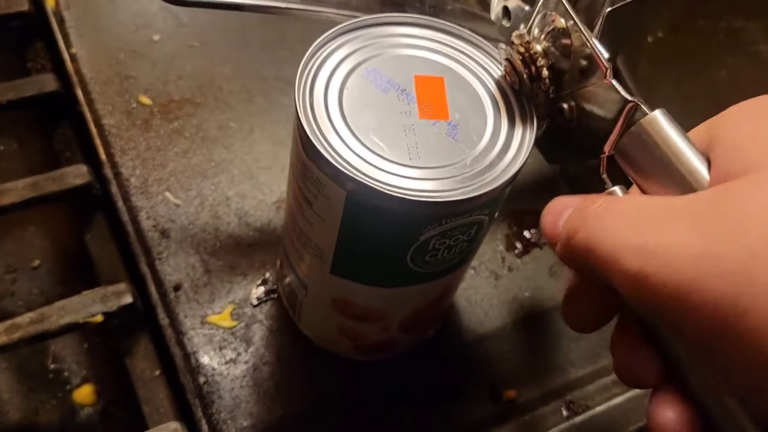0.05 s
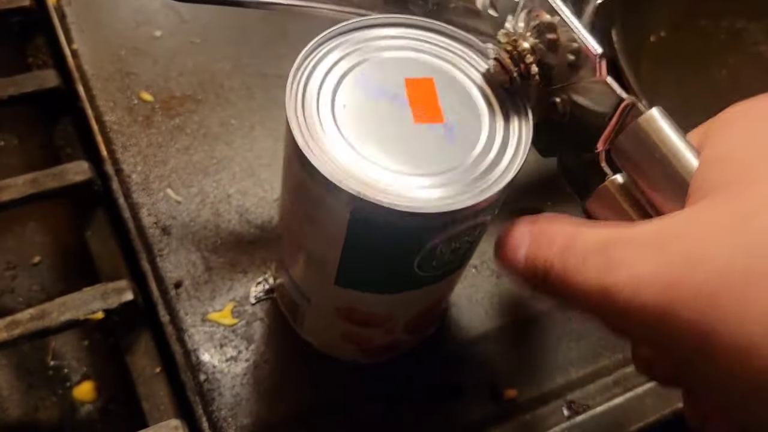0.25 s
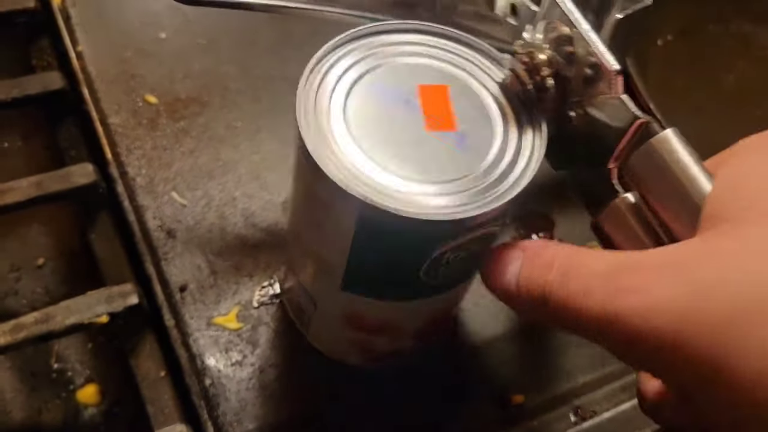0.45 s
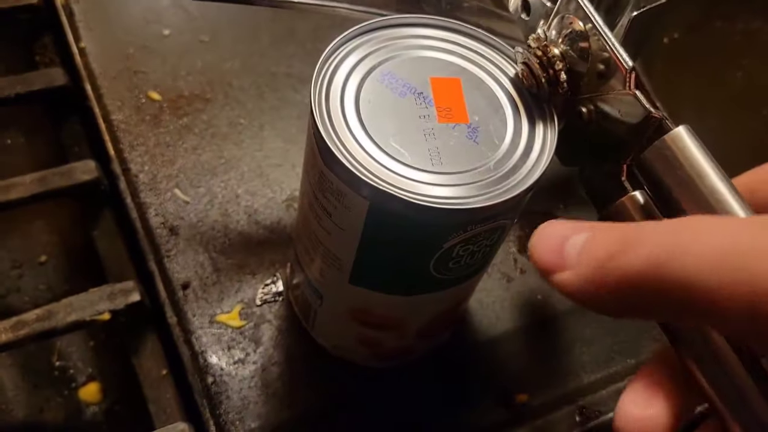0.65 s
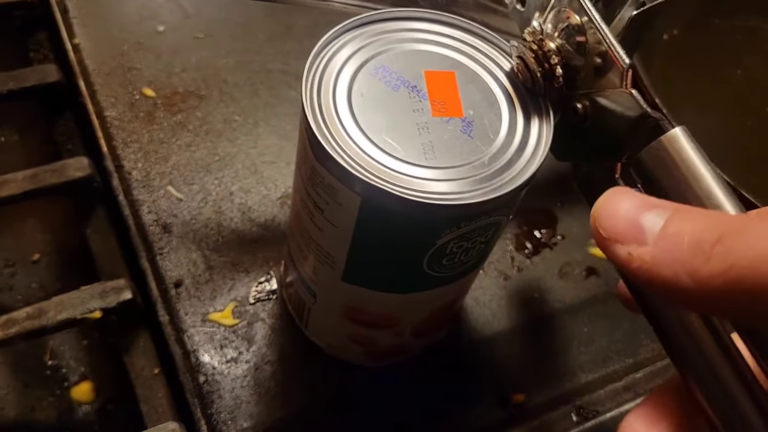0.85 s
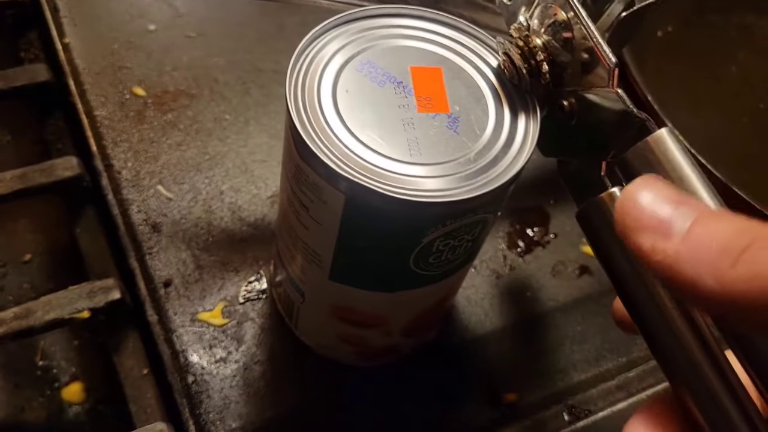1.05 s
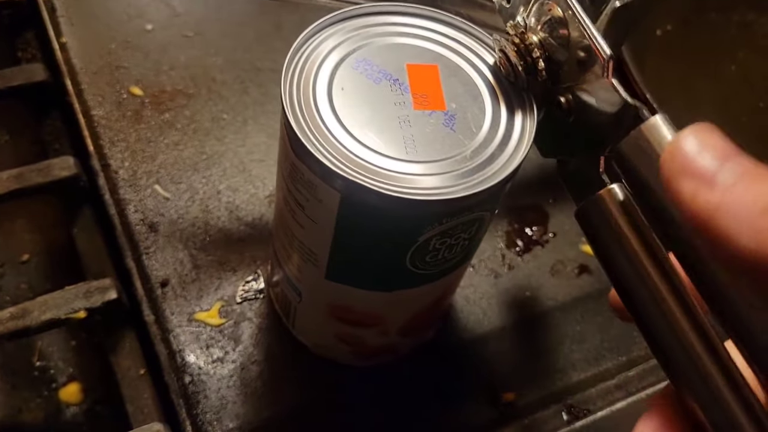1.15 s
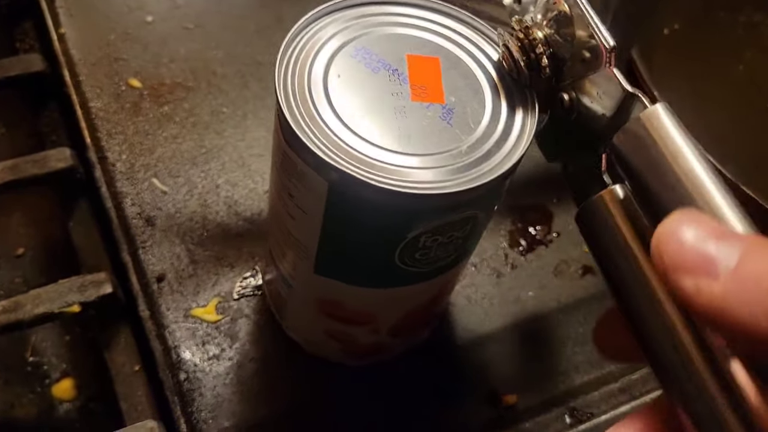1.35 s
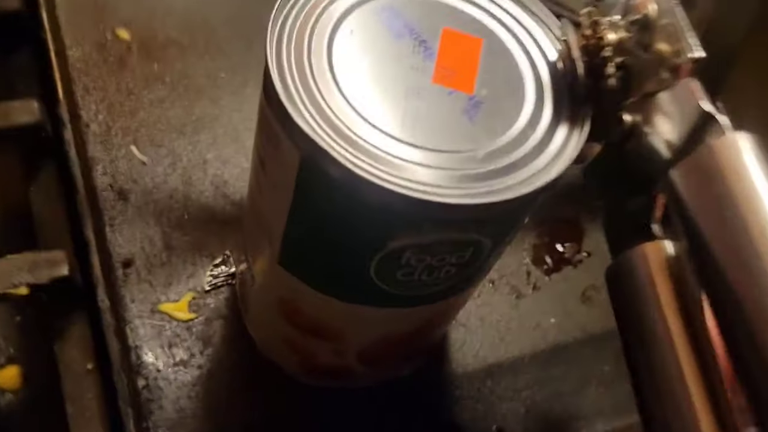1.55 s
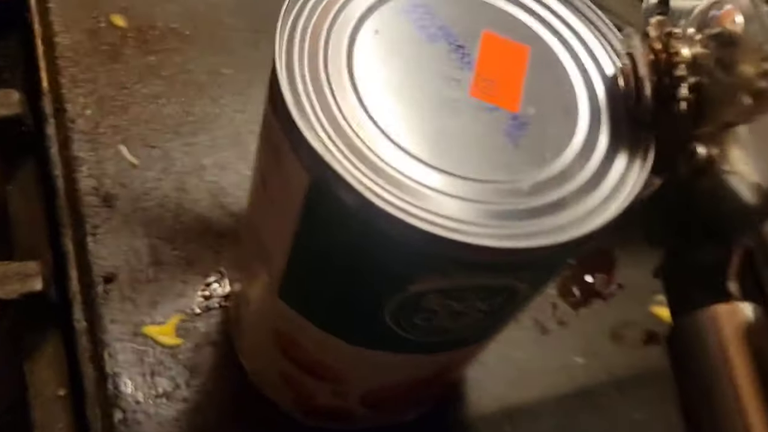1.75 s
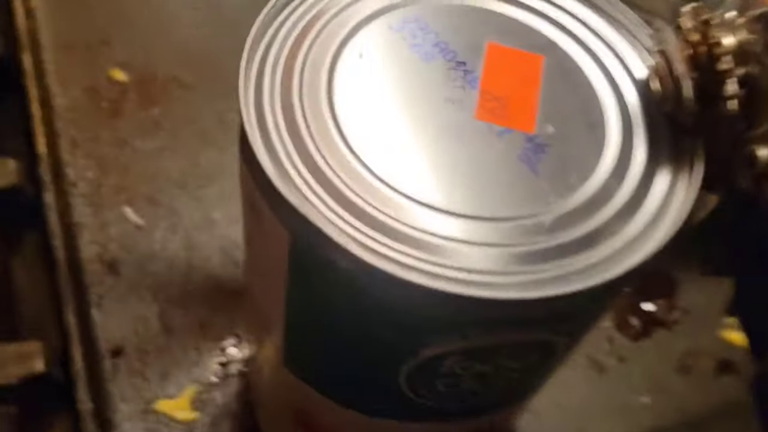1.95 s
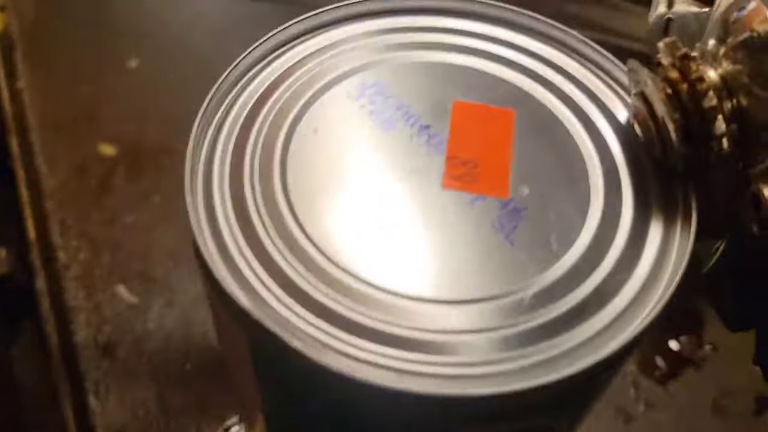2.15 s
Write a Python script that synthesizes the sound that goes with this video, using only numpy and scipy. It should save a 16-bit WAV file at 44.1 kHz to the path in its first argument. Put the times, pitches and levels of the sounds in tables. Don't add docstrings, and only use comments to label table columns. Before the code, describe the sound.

A can opener punctures a steel can: a tiny creak, then a loud tearing metallic snap at 0.39 s with a hollow ring, damped as the full can bumps and rocks at 0.63 s. Air puffs near 0.7 s and leaks with faint wavering whistles until 1.2 s. Tool clicks come at 1.57, 1.92 and 2.02 s, strongest around 2.13 s. Quiet small kitchen, low fridge hum, close stereo microphones.

```python
import sys
import numpy as np
from scipy import signal
from scipy.fft import rfft, irfft, next_fast_len
from scipy.io import wavfile
from scipy.ndimage import uniform_filter1d, map_coordinates

SR = 44100
rng = np.random.default_rng(int(sys.argv[2]) if len(sys.argv) > 2 else 0)


def wav_record(signal):
    frames = np.transpose(np.atleast_2d(signal))
    bounded = np.clip(frames, -1, 1)
    quanta = np.round(bounded * 32767).astype(np.int16)
    wavfile.write(sys.argv[1], SR, quanta)


def gain_from_db(level_db):
    decades = np.asarray(level_db, float) / 20
    return 10 ** decades


N = 97064
TIME_S = np.arange(N) / SR
PORTS = np.array([[1], [-1]])
SNAP_S, SNAP_PAN_DB = .3873, -1.5

# f/Hz, level/dB, t60/s, half lead of left port/rad
CAN_MODES = [(750, -12, .55, .3), (851, -10, .17, .5), (1037, -13, .25, .7), (1306, -2, .1, .9),
             (2440, -24, .1, .2), (2093, -25, .11, 0), (2180, -24, .2, -.7), (2585, -10, .08, -.35),
             (2845, -17, .22, -.5), (3305, -26, .17, .5), (506, -17, .16, -.2), (5130, -40, .7, .3),
             (7550, -54, 1.2, .3)]
# f/Hz, level/dB, t60/s
LID_MODES = [(1094, -23.5, 0.13), (3907, -25.5, 0.0076), (323.3, -31, 0.3), (577.2, -22.5, 0.14),
             (387, -27.5, 0.13), (196.1, -37.5, 0.18), (117, -39.5, 0.057)]


def can_ring():
    strike_db, lid_lead_rad = -8, .2
    rise_s, onset_s = .004, .00057
    pop_hz, pop_db, pop_hold_s, pop_t60_s, pop_lead_rad = 1030, -6.5, .005, .02, .55
    land_s, landed_t60_s = .63, .15
    t = since(SNAP_S)
    modes = [(f, db + strike_db, t60, lead) for f, db, t60, lead in CAN_MODES]
    modes += [(f, db, t60, lid_lead_rad) for f, db, t60 in LID_MODES]
    ring = 0
    for f, db, t60, lead in modes:
        ring = ring + gain_from_db(db) * fade(t, t60) * np.sin(2 * np.pi * f * t + PORTS * lead)
    ring = ring * (1 - 0.82 * np.exp(-t / rise_s))
    pop_level = gain_from_db(pop_db) * gain_from_db(-60 * (t - pop_hold_s).clip(0) / pop_t60_s)
    pop = pop_level * np.sin(2 * np.pi * pop_hz * t + PORTS * pop_lead_rad)
    onset = 1 - np.exp(-t / onset_s)
    landing = gain_from_db(-60 * since(land_s) / landed_t60_s)
    return pan(SNAP_PAN_DB) * (ring + pop) * onset * landing


# f/Hz, density/dB per Hz
TEAR_SPECTRUM = [(88, -37.5), (150, -17.5), (1310, -16), (1560, -24.5), (2550, -21.5), (6260, -27),
                 (10200, -48.5), (12700, -35), (16000, -47)]


def tear():
    t = since(SNAP_S)
    level = gain_from_db(-16) * fade(t, 0.055) + gain_from_db(-25.5) * fade(t, 0.22)
    return pan(SNAP_PAN_DB) * level * noise(TEAR_SPECTRUM, 0.38)


# f/Hz, density/dB per Hz
GRIT_SPECTRUM = [(700, -45.5), (1500, -7), (3500, -13), (4800, -7), (6800, -16.5), (8500, -32.5),
                 (14000, -22), (16500, -44.5)]


def creak():
    length_s, rise_db, pan_db = .014, 30, 11.5
    grit_db, tone_hz, tone_db = -24, 2130, -28
    t = since(SNAP_S - length_s)
    before_snap = (t > 0) * (since(SNAP_S) == 0)
    swell = before_snap * gain_from_db(rise_db * (t / length_s - 1).clip(-1, 0))
    grit = gain_from_db(grit_db) * noise(GRIT_SPECTRUM, .6) * swell
    tone = gain_from_db(tone_db) * np.sin(2 * np.pi * tone_hz * t) * swell ** .6
    return pan(pan_db) * (grit + tone)


# t/s, level/dB, f/Hz, length/cycles
BUMP_EVENTS = [(.630, -23, 512, 1.9), (0.632, -26.5, 1050, 2.5), (.640, -33.5, 753, 19.3),
               (0.65, -29, 290, 2.5), (.652, -36, 600, 9), (0.667, -31.5, 307, 4.6), (.686, -32, 305, 3.9),
               (0.719, -41.5, 292, 4.9), (.637, -34, 900, 4), (.706, -38, 200, 2.3), (.64, -36, 315, 40),
               (2.122, -27.5, 490, 1.44), (2.14, -27, 63.3, 1.4), (1.931, -34, 72, 0.33)]


def bumps():
    pan_db, left_lag_s = 2, -0.00025
    out = 0
    for s, db, f, cycles in BUMP_EVENTS:
        t = since(s, left_lag_s)
        decay = 3 * f / cycles
        envelope = np.e * decay * t * np.exp(-decay * t)
        out = out + gain_from_db(db) * envelope * np.sin(2 * np.pi * f * t)
    return pan(pan_db) * out


# f/Hz, density/dB per Hz
SCUFF_SPECTRUM = [(90, -35), (150, 0.5), (400, -6), (1100, -8.5), (2000, -20), (6000, -24), (9000, -37.5)]
# t/s, length/s, level/dB
SCUFF_EVENTS = [(0.629, 0.091, -40), (1.45, 0.32, -57), (-.05, 0.13, -49), (.381, 0.0072, -34),
                (.69, 0.13, -55), (.4, 0.14, -39.5), (1.78, 0.16, -62), (1.93, 0.029, -43.5),
                (2.014, 0.084, -51.5), (2.067, 0.14, -50), (2.129, 0.013, -34.5)]


def scuffs():
    return swells(SCUFF_EVENTS, 0.61) * gain_from_db(5.5 * wobble(90)) * noise(SCUFF_SPECTRUM, 0.21)


# f/Hz, density/dB per Hz
METAL_SPECTRUM = [(200, -44), (400, 1), (1500, -3), (3500, -1), (6500, -11), (8500, -39), (14000, -18),
                  (16500, -26.5)]
# t/s, level/dB, f/Hz, length/cycles,
# L-R/dB
CLICK_EVENTS = [(1.575, -24, 974, 4.8, 9.5), (1.5736, -25, 2660, 2.9, 13), (1.784, -42, 2600, 2.8, 11),
                (1.921, -17, 1220, 2.6, -5), (1.921, -22, 319, 1.53, -14.5), (1.9206, -7, 2800, 4, -3.7),
                (1.9206, -13, 3500, 3, -2.7), (1.9206, -14, 4400, 3, -5), (.3875, -9, 4200, 3, 1.4),
                (.3915, -14, 5000, 3, 3), (1.5743, -36, 5800, 3, 12), (1.9246, -19.5, 3600, 3.5, -2),
                (1.9272, -34, 5660, 8, 0.5), (1.937, -29, 1490, 3.4, -1), (2.0, -43, 700, 2.3, 14),
                (2.0188, -22, 970, 2.25, 7.5), (2.0194, -33.5, 3040, 1.3, 8.5), (2.0199, -20, 4500, 2, 11),
                (2.019, -23.5, 5870, 4, 11), (2.031, -38, 910, 3.3, 10), (2.043, -30.5, 900, 2.7, 8),
                (2.06, -45, 800, 3.4, 6), (2.123, -29.5, 3050, 18, 2.5), (2.1296, -4, 3310, 4.6, -6),
                (2.1303, -24, 13600, 15, -11.5), (2.1325, -5, 2000, 1.02, 11.5),
                (2.1327, -19, 7170, 10.4, 10.5), (2.1334, -24, 3700, 4.2, 9.5),
                (2.1381, -9.5, 2740, 1.8, 13)]


def clicks():
    lag_s, lag_s_per_db = .0001, -.00007
    spit_db, spit_t60_s, spit_rise_s = -14, .005, .00019
    metal = noise(METAL_SPECTRUM, .3)
    out = 0
    for s, db, f, cycles, side_db in CLICK_EVENTS:
        t = since(s, lag_s + lag_s_per_db * side_db)
        mode = np.sin(2 * np.pi * f * t) * np.exp(-2 * t * f / cycles) * (1 - np.exp(-6 * t * f))
        spit = gain_from_db(spit_db) * fade(t, spit_t60_s) * (1 - np.exp(-t / spit_rise_s)) * metal
        out = out + gain_from_db(db) * pan(side_db) * (mode + spit)
    return out


# t/s, length/s, level/dB
SLIP_EVENTS = [
    (.331, .008, -54),
    (1.565, 0.0052, -49.5),
    (1.91, 0.018, -44),
    (1.924, .005, -43),
    (.64, .055, -50),
    (1.6, .05, -60),
    (2.01, 0.012, -51.5),
    (2.105, 0.034, -40),
    (1.8, 0.0073, -52.5),
    (1.84, 0.0069, -60),
]


def slips():
    return swells(SLIP_EVENTS, 1.5) * gain_from_db(1.3 * wobble(900)) * noise(GRIT_SPECTRUM, .3)


# f/Hz, density/dB per Hz
PUFF_SPECTRUM = [(1180, -35), (2000, -9), (2320, -29), (3260, -7.5), (4650, -11.5), (6590, -1.5),
                 (8930, -19), (13800, -10.5), (16000, -19.5)]
LEAK_SPECTRUM = [(1060, -54), (1800, -8), (2620, -14.5), (3140, -3.5), (4490, -10.5), (6070, 2),
                 (8590, -16.5), (13000, -13), (16000, -12)]
# t/s, length/s, level/dB
PUFF_EVENTS = [
    (.628, 0.061, -66),
    (.672, 0.083, -44.5),
    (.805, 0.071, -60),
]
LEAK_EVENTS = [
    (.78, 0.31, -60),
    (.97, 0.21, -50),
    (1.59, 0.066, -59),
    (1.78, 0.17, -64.5),
    (2.06, .07, -60.5),
    (.735, .08, -66.5),
]


def hiss():
    puffs = swells(PUFF_EVENTS, 0.9) * noise(PUFF_SPECTRUM, 0.32)
    leaks = swells(LEAK_EVENTS, 0.78) * patchy(noise(LEAK_SPECTRUM, 0.2), 3.5)
    return gain_from_db(1.0 * wobble(36.7)) * (puffs + leaks)


# t/s, f/Hz, level/dB
WHISTLE_GLIDES = [
    [(.88, 4900, -68), (.905, 5500, -59), (.94, 5200, -59), (.952, 4800, -56), (.982, 4550, -59),
     (.986, 4150, -58), (1.02, 3800, -62), (1.08, 3700, -66)],
    [(1.07, 3300, -68), (1.09, 3250, -56), (1.105, 2950, -64), (1.115, 3050, -54), (1.14, 3100, -55),
     (1.158, 3000, -72)],
    [(1.075, 6100, -62), (1.092, 6400, -52), (1.105, 5500, -52), (1.118, 4200, -55), (1.135, 3900, -55),
     (1.15, 3300, -64), (1.165, 2300, -68), (1.19, 1500, -74)],
    [(.985, 6100, -60), (1.04, 5900, -62), (1.11, 6000, -60), (1.13, 6350, -55), (1.15, 5500, -63),
     (1.178, 3700, -70)],
    [(.94, 7300, -66), (.955, 7200, -60), (.975, 6900, -70)],
    [(1.01, 2100, -74), (1.05, 2150, -68), (1.095, 2200, -72)],
    [(1.0, 5300, -66), (1.008, 5000, -58), (1.02, 4800, -68)],
    [(1.015, 12900, -72), (1.03, 12600, -64), (1.045, 12300, -72)],
]


def whistles():
    gain_db, waver = 3, .015
    squeak_s, squeak_hz, squeak_db = .82, 14400, -53
    squeak = [(squeak_s - .014, squeak_hz, -80), (squeak_s, squeak_hz, squeak_db), (squeak_s + .016, squeak_hz, -80)]
    out = 0
    for rows in list(WHISTLE_GLIDES) + [squeak]:
        s, f, db = np.transpose(rows)
        hz = np.interp(TIME_S, s, f)
        phase = 2 * np.pi * np.cumsum(hz * (1 + waver * wobble(60))) / SR
        level = gain_from_db(np.interp(TIME_S, s, db, -120, -120) + gain_db)
        out = out + level * narrow(phase, hz)
    return out


# f/Hz, L-R/dB
AIR_SIDE = [(0, 0), (1300, 1), (2400, 5), (4400, 10), (7500, 12), (12000, 6), (30000, 3)]


def air():
    return sided(hiss() + whistles(), AIR_SIDE)


# f/Hz, t60/s
ROOM_DECAY = [(200, 0.32), (2000, 0.18), (10000, .08)]


def room(x):
    hz, t, z = signal.stft(rng.standard_normal((2, SR // 2)), SR, nperseg=256)
    f, t60 = np.transpose(ROOM_DECAY)
    decay = gain_from_db(-60 * t / np.interp(hz, f, t60)[:, None])
    tail = signal.istft(z * decay, SR, nperseg=256)[1]
    tail = tail / np.linalg.norm(tail[0])
    late = np.pad(x, ((0, 0), (150, 0)))
    return signal.fftconvolve(late, tail, axes=1)[:, :N]


# f/Hz, level/dB rms
HUM_LINES = [(59.2, -44.5), (118.4, -61)]
# f/Hz, density/dB per Hz
RUMBLE_SPECTRUM = [(15, -35), (30, -7.5), (50, -7), (75, -2), (110, -12.5), (200, -81)]
KITCHEN_SPECTRUM = [(70, -22.5), (110, -13), (350, -11.5), (1000, -22), (6500, -23), (7800, -29.5),
                    (8800, -48.5), (13500, -36), (15500, -48), (16500, -78.5)]
# f/Hz, L-R/dB
KITCHEN_SIDE = [(0, -2), (700, -2), (1300, 1), (4400, 2), (7000, 6), (15000, 1), (30000, 0)]


def kitchen():
    rumble_db, hiss_db, low_pan_db, lag_samples = -56, -58.5, -3, -15
    hum = 0
    for f, db in HUM_LINES:
        sway = gain_from_db(db + .7 * wobble(9)) * np.sqrt(2)
        hum = hum + sway * np.sin(2 * np.pi * f * TIME_S + 0.21 * wobble(2.5))
    low = pan(low_pan_db) * (hum + gain_from_db(rumble_db) * noise(RUMBLE_SPECTRUM, 1.0))
    room_hiss = sided(patchy(noise(KITCHEN_SPECTRUM, 0.37), 0.4), KITCHEN_SIDE)
    left, right = low + gain_from_db(hiss_db + .8 * wobble(1.2)) * room_hiss
    return np.array([np.roll(left, lag_samples), right])


def unit(x):
    return x / np.sqrt(np.mean(x ** 2) + 1e-20)


def along(points, hz):
    f, v = np.transpose(points)
    return np.interp(np.log(hz + 1), np.log(f + 1), v, -120, -120)


def wobble(rate_hz):
    knots = rng.standard_normal(int(N * rate_hz / SR) + 4)
    return map_coordinates(knots, [np.arange(N) * rate_hz / SR])


def filtered(x, response):
    m = next_fast_len(N + 8192)
    return irfft(rfft(x, m) * response(np.fft.rfftfreq(m, 1 / SR)), m)[..., :N]


def noise(spectrum, alike):
    a, b = filtered(rng.standard_normal((2, N)), lambda hz: gain_from_db(along(spectrum, hz)))
    u = np.arccos(np.clip(alike, -1, 1)) / 2
    return unit(np.cos(u) * a + PORTS * np.sin(u) * b)


def since(s, lag_s=0.):
    return np.maximum(TIME_S - s - PORTS * lag_s / 2, 0)


def fade(t, t60_s):
    return (t > 0) * gain_from_db(-60 * t / t60_s)


def pan(db):
    return gain_from_db(PORTS * db / 2)


def swells(rows, skew):
    out = 0
    for s, length_s, db in rows:
        progress = (since(s) / length_s).clip(0, 1)
        out = out + gain_from_db(db) * np.sin(np.pi * progress ** skew).clip(0) ** 1.7
    return out


def narrow(phase, hz):
    phase = phase + [[0], [1.2]]
    rough_hz = 330 * (hz.max() / 4000) ** 1.5
    return (.6 + .7 * wobble(rough_hz / 3)) * np.sin(phase) + .8 * wobble(rough_hz) * np.cos(phase)


def sided(x, points):
    return filtered(x, lambda hz: gain_from_db(along(points, hz) * PORTS / 2))


def patchy(x, db):
    z = signal.stft(x, nperseg=512)[2]
    field = uniform_filter1d(rng.standard_normal(z.shape[1:]), size=5, axis=0)
    field = uniform_filter1d(field, size=7, axis=1)
    return signal.istft(z * gain_from_db(db * unit(field)), nperseg=512)[1][:, :N]


def scene():
    can = can_ring() + tear() + creak() + bumps() + scuffs()
    tool = clicks() + slips()
    echoes = room(gain_from_db(-15) * can + gain_from_db(-25) * tool)
    return can + tool + echoes + air() + kitchen()


def roll_off(x):
    return signal.sosfilt(signal.butter(12, 16650, fs=SR, output="sos"), x)


def record(dry):
    mix = filtered(dry, lambda hz: hz < 16600)
    return roll_off(mix)


dry = scene()
out = record(dry)
wav_record(out)
```